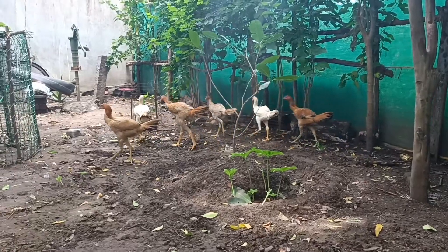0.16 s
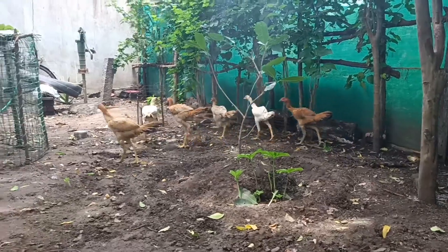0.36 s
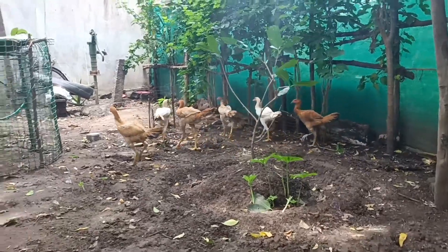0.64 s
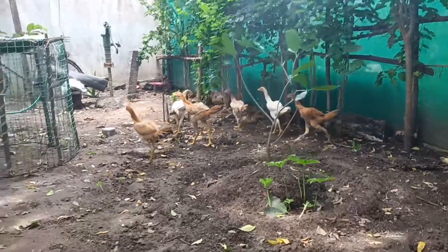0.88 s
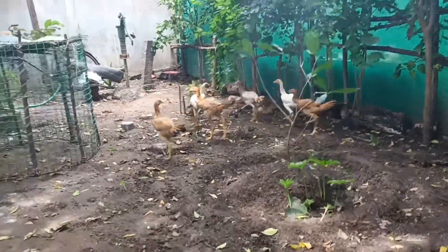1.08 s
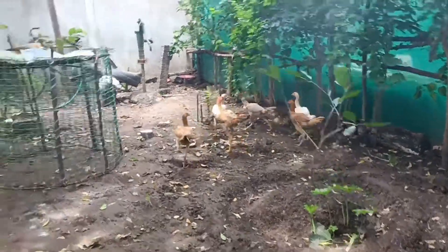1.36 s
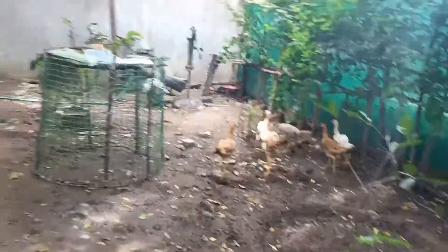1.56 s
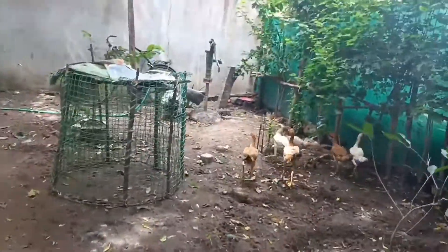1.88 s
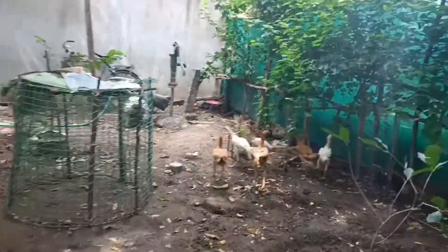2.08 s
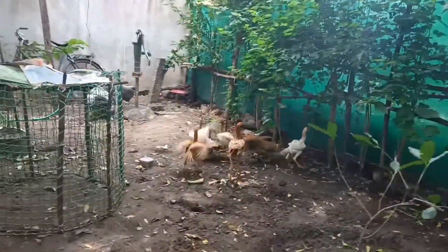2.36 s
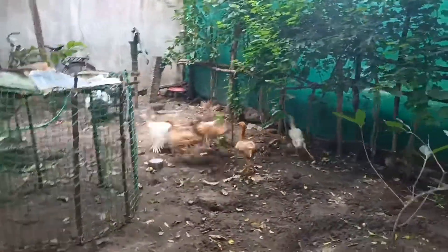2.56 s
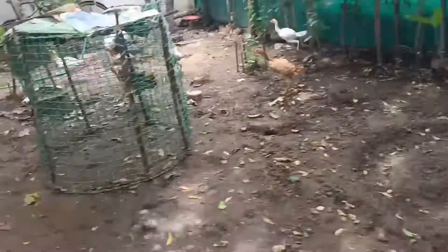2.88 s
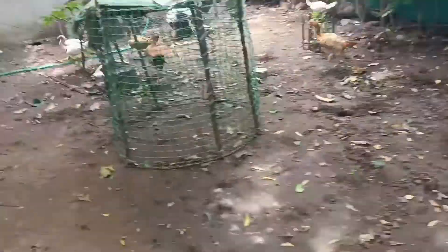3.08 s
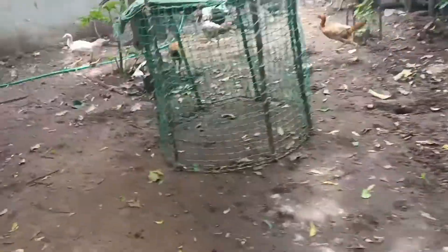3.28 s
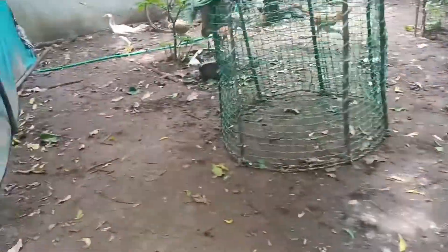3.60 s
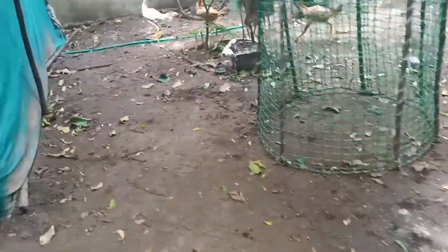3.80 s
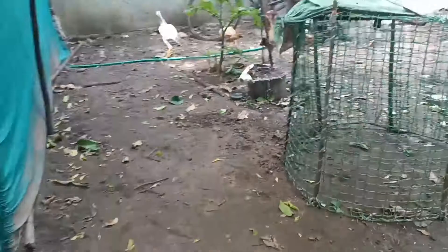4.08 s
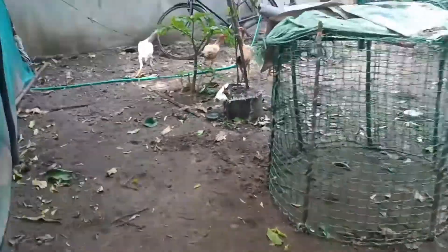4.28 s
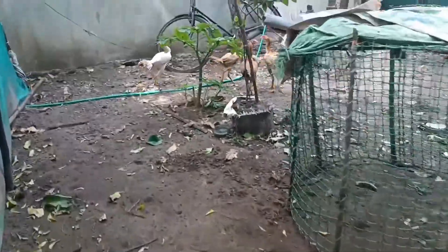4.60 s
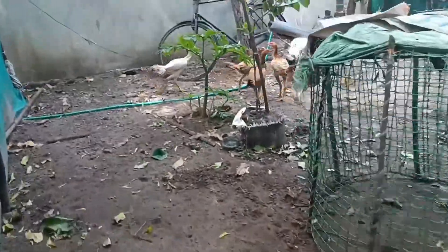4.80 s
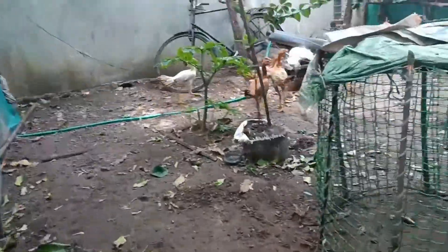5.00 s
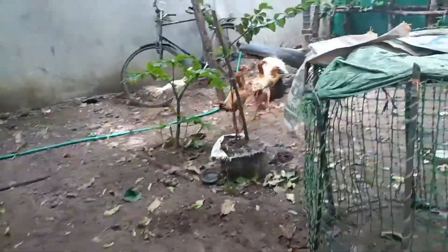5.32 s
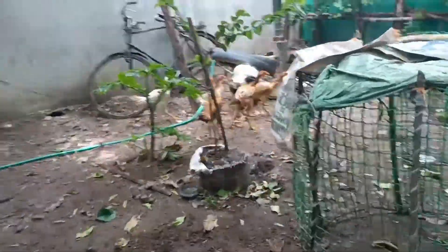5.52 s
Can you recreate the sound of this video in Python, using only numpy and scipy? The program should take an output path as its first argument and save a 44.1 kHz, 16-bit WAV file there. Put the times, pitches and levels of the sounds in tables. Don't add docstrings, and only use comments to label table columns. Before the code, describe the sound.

Quiet yard with faint peeps, then a loud flurry of flapping, leaf crackle and a rattling cage, followed by hoarse hen squawks and light footsteps.

```python
import sys
import numpy as np
from scipy import signal
from scipy.fft import rfft, irfft, next_fast_len
from scipy.io import wavfile
from scipy.ndimage import uniform_filter1d

SR = 44100
rng = np.random.default_rng(int(sys.argv[2]) if len(sys.argv) > 2 else 0)


def amplitude_ratio(level_db):
    exponent = np.asarray(level_db, float) / 20
    return 10 ** exponent


def put_to_file(sound):
    columns = np.atleast_2d(sound).T
    safe = np.clip(columns, -1, 1)
    whole_steps = np.round(safe * 32767)
    wavfile.write(sys.argv[1], SR, whole_steps.astype(np.int16))


N = 249165


def evened(x):
    return x / np.sqrt(np.mean(x ** 2) + 1e-20)


def read(points, hz):
    f, value = np.transpose(points)
    return np.interp(np.log(hz + 1), np.log(f + 1), value)


def add(mix, s, sound):
    part = mix[round(s * SR):][:len(sound)]
    part += sound[:len(part)]


def coloured(x, points):
    size = next_fast_len(len(x))
    gain = amplitude_ratio(read(points, np.fft.rfftfreq(size, 1 / SR)))
    return evened(irfft(rfft(x, size) * gain, size)[:len(x)])


def wobble(length, smooth_s):
    size = max(int(smooth_s * SR), 2)
    once = uniform_filter1d(rng.standard_normal(length), size)
    return evened(uniform_filter1d(once, size))


def resonate(x, hz, width_hz):
    turn = np.exp(2j * np.pi * np.cumsum(hz) / SR)
    r = np.exp(-np.pi * width_hz / SR)
    low = signal.lfilter([(1 - r) ** 2], [1, -2 * r, r * r], x / turn)
    return 2 * (turn * low).real


def sparse_breaks(per_s, spread_db):
    size = amplitude_ratio(spread_db * np.minimum(rng.exponential(1, N), 4))
    return size * (rng.random(N) < per_s / SR)


def crackle(per_s, spread_db, share):
    breaks = evened(sparse_breaks(per_s, spread_db) * rng.standard_normal(N))
    return share * breaks + np.sqrt(1 - share ** 2) * rng.standard_normal(N)


def swell(peak_s, rise_s, dying_s):
    drop_db = 15.5
    t = np.arange(N) / SR - peak_s
    return amplitude_ratio(-2 * drop_db * np.maximum(-t / rise_s, t / dying_s))


# frequency in Hz, level in dB per Hz.
WIND_SPECTRUM = [(15, -50), (25, -8), (51, -1), (86, 8), (134, 0.5), (187, -10.5), (250, -39), (320, -47),
                 (550, -120)]
# time in seconds, level in dB.
BREEZE = [(0, -52), (.63, -58), (.97, -48), (1.07, -54.5), (1.35, -52), (1.86, -70), (2.22, -60),
          (2.3, -40.5), (2.859, -50), (3.05, -54.5), (3.8, -49), (4.15, -50.5), (5, -52.5), (5.45, -49),
          (5.65, -53)]
# peak in seconds, dying time in seconds, level in dB.
PUFFS = [(.55, 0.038, -39.5), (1.121, 0.12, -33), (1.299, 0.099, -40), (1.92, 0.58, -58),
         (2.52, 0.041, -41), (3.341, 0.014, -36.5), (3.59, 0.04, -46), (3.71, 0.039, -33),
         (4.31, 0.19, -46), (4.5, 0.069, -43.5), (4.94, 0.015, -44), (5.07, .2, -52)]


def wind():
    power = amplitude_ratio(2 * np.interp(np.arange(N) / SR, *np.transpose(BREEZE)))
    for s, dying_s, db in PUFFS:
        power = power + amplitude_ratio(2 * db) * swell(s, 0.028, dying_s)
    lumps = amplitude_ratio(0.36 * wobble(N, 0.017))
    return np.sqrt(power) * lumps * coloured(rng.standard_normal(N), WIND_SPECTRUM)


# frequency in Hz, level in dB per Hz.
HUSH_SPECTRUM = [(18, -44), (30, -5), (81, -3), (295, -5.5), (336, -5.5), (449, -5.5), (780, -11.5),
                 (5740, -42), (8980, -27), (16000, -56)]


def far_hush():
    return amplitude_ratio(-63) * coloured(rng.standard_normal(N), HUSH_SPECTRUM)


# time in seconds, stir in dB, bare soil over leaves in dB.
STIR = [(0, -70, 12), (.2, -60.5, -0.5), (.93, -65, 6.5), (1.21, -64.5, 6.5), (1.72, -70.5, -0.5),
        (1.89, -66.5, 1), (1.93, -75, 9), (2.26, -62.5, -11), (2.32, -48.5, 3.5), (2.7, -46, -6),
        (3.02, -44, -4.5), (3.49, -72.5, 12), (3.7, -63, 9.5), (4.23, -61.5, 11), (4.9, -59, 7),
        (5.13, -60, 4.5), (5.32, -54, 3.5), (5.65, -57.5, 3)]
# peak in seconds, dying time in seconds, strength, dig into soil and weight in dB.
STEPS = [
    (0.831, 0.12, -58, -11, 10),
    (3.869, 0.11, -56.5, 12.5, 3.5),
    (4.4, 0.038, -52.5, -4, -2),
    (4.639, 0.16, -53.5, 11, -16),
    (5.268, 0.018, -45, 5.5, -22),
    (5.57, 0.06, -66, 12, -3),
]
SCUFFS = [
    (0.541, 0.048, -47, -1.5, 3.5),
    (1.92, 0.45, -52, 3.5, -2.5),
    (2.297, 0.1, -38, -5, 5.5),
    (2.394, 0.13, -29, -4.5, -0.5),
    (2.722, 0.097, -33, 2.5, 5.5),
    (5.166, 0.14, -47.5, 7, -24.5),
]
FLAPS = [
    (2.522, 0.085, -31.5, 0.5, 5.5),
    (2.61, 0.11, -37, -3, 9),
    (3.08, 0.062, -40, -21, -22),
]
FLUTTERS = [
    (2.898, 0.046, -40, -1, -1),
    (3.131, 0.11, -39, -3, -28),
    (3.19, 0.032, -43.5, -2, -7),
    (3.259, 0.2, -42.5, 1, -13),
    (3.338, 0.046, -45, -6, -1),
    (3.409, 0.16, -48.5, 0.5, 0),
    (3.5, 0.24, -51, 0, -15),
]
# rise in seconds, feather swish over strength in dB.
STROKE_KINDS = [
    (0.038, 3),
    (0.018, -10),
    (0.063, -4.5),
    (0.051, 4),
]


def effort():
    s, *columns = np.transpose(STIR)
    stir_db, bare_db = (np.interp(np.arange(N) / SR, s, c) for c in columns)
    layers_db = np.array([0 * bare_db, bare_db / 2 - 3.5, bare_db, bare_db - 4.5])
    power = amplitude_ratio(2 * (stir_db + layers_db))
    for rows, (rise_s, swish_db) in zip((STEPS, SCUFFS, FLAPS, FLUTTERS), STROKE_KINDS):
        for peak_s, dying_s, db, dig_db, weight_db in rows:
            layers_db = db + np.array([0, swish_db, dig_db, weight_db])
            power = power + amplitude_ratio(2 * layers_db)[:, None] * swell(peak_s, rise_s, dying_s)
    return np.sqrt(power)


def patchy(x):
    z = signal.stft(x, nperseg=256)[2]
    field = uniform_filter1d(rng.standard_normal(z.T.shape), size=4, axis=0)
    field = uniform_filter1d(field, size=9, axis=1)
    lift = amplitude_ratio(1.8 * evened(field).T)
    return evened(signal.istft(z * lift, nperseg=256)[1][:N])


def pebbles(per_s, spread_db, cycles):
    size = sparse_breaks(per_s, spread_db)
    kind, out = rng.integers(0, 24, N), np.zeros(N)
    for k, hz in enumerate(np.geomspace(500, 4500, 24)):
        turns = np.arange(int(3 * cycles * SR / hz)) * hz / SR
        ring = np.sin(2 * np.pi * turns) * np.exp(-turns / cycles)
        ring = ring * np.minimum(turns, 1) * np.sqrt(hz)
        out += signal.oaconvolve(size * (kind == k), ring)[:N]
    return evened(out)


# frequency in Hz, level in dB per Hz.
LEAVES = [(3240, -29.5), (5500, -17), (6120, -16.5), (7520, -12), (9400, 0), (10200, -10), (12200, -15.5),
          (14900, -23), (16000, -12.5)]
# frequency in Hz, level in dB per Hz.
SWISH = [(2500, -7), (3500, 1), (4500, 0.5), (6000, -6), (7500, -2), (9000, -55)]
# frequency in Hz, level in dB per Hz.
SOIL = [(250, -36), (400, -11), (800, -6), (1400, -0.5), (2100, 0), (2900, -3.5), (3400, -12),
        (4600, -18.5), (7000, -27.5)]
# frequency in Hz, level in dB per Hz.
THUD = [(53, -65), (90, -6), (135, 1), (313, -0.5), (410, -4), (496, -15.5), (554, -5), (600, -10),
        (780, -9.5), (1320, -120)]


def movement():
    jostle = wobble(N, 0.033)
    leaves = patchy(coloured(crackle(2500, 2.9, 0.47), LEAVES))
    leaves = amplitude_ratio(1.53 * jostle + 1.16 * wobble(N, 0.003)) * leaves
    swish = amplitude_ratio(2 * jostle - 6) * patchy(coloured(crackle(3000, 4, 0.38), SWISH))
    grit = coloured(crackle(1200, 4, 0.3), SOIL) + 0.7 * coloured(pebbles(900, 3.5, 10), SOIL)
    soil = amplitude_ratio(1.4 * jostle) * grit
    thud = amplitude_ratio(1.5 * wobble(N, 0.019)) * coloured(crackle(300, 0.7, 0.4), THUD)
    return (effort() * [leaves, swish, soil, thud]).sum(0)


def note(length_s, start_hz, end_hz, parts_db, rough):
    u = np.linspace(0, 1, int(length_s * 1.154 * SR))
    glide = (1 - np.cos(np.pi * u)) / 2
    hz = start_hz + (end_hz - start_hz) * glide + 150 * rough * wobble(len(u), 0.0018)
    turns = np.cumsum(hz) / SR
    tone = sum(amplitude_ratio(db) * np.sin(2 * np.pi * (k + 1) * turns) for k, db in enumerate(parts_db))
    falter = amplitude_ratio(1.5 * (wobble(len(u), 0.004) - 0.5))
    shape = np.sin(np.pi * u ** 0.82) ** 0.83 * falter
    return np.sqrt(2) * tone * shape * (1 + rough * wobble(len(u), 0.0016))


# start
# and length in seconds, start and end pitch in Hz, level in dB.
THIN_PEEPS = [(.905, 0.062, 900, 908, -49), (.965, 0.046, 986, 880, -46.5), (3.528, 0.046, 1720, 1710, -43),
              (1.254, 0.028, 1108, 1043, -37), (1.544, 0.053, 905, 872, -51.5),
              (1.774, 0.034, 930, 934, -57.5), (2.007, 0.06, 960, 896, -47),
              (2.335, 0.016, 1260, 1520, -27), (2.35, 0.016, 1440, 1270, -18.5),
              (2.346, 0.037, 1990, 2055, -29.5), (2.364, 0.014, 1058, 993, -18.5),
              (2.366, 0.01, 3110, 3030, -32), (2.368, 0.023, 4150, 4035, -42.5),
              (2.489, 0.017, 1434, 1330, -27), (2.506, 0.013, 1350, 1270, -19),
              (2.66, 0.068, 1583, 1516, -38.5), (2.49, 0.044, 1804, 1764, -31.5),
              (2.566, 0.016, 1400, 1250, -29.5), (2.59, 0.054, 886, 905, -33),
              (3.39, 0.018, 2114, 2060, -53), (3.44, 0.037, 2110, 2130, -46.5),
              (3.481, 0.038, 2060, 2074, -46), (3.573, 0.019, 1140, 1130, -42.5),
              (3.713, 0.04, 1942, 2080, -44.5), (4.972, 0.038, 2100, 1998, -35.5),
              (5.015, .016, 1970, 1930, -42), (5.083, 0.029, 1166, 1130, -48.5),
              (5.145, 0.033, 945, 796, -39.5), (5.548, 0.04, 3700, 3690, -57.5),
              (5.575, 0.016, 2790, 2820, -53)]
# start and length in seconds, start and end pitch in Hz, level in dB.
REEDY_PEEPS = [(.24, 0.068, 900, 853, -61.5), (1.1, 0.078, 824, 783, -51.5), (1.312, 0.052, 920, 850, -59),
               (2.222, 0.048, 824, 745, -45), (2.384, 0.032, 773, 910, -30.5),
               (3.524, 0.072, 878, 878, -40), (3.727, 0.03, 1202, 935, -35.5),
               (4.292, 0.041, 1197, 1000, -33.5), (4.645, .04, 890, 833, -43),
               (4.977, 0.047, 1232, 1086, -38), (5.007, 0.057, 1026, 920, -44.5),
               (5.109, 0.026, 860, 800, -46), (5.178, 0.025, 892, 996, -38),
               (5.195, 0.02, 1295, 1250, -40.5)]


def peeps():
    out = np.zeros(N)
    for rows, octave_db in ((THIN_PEEPS, -43), (REEDY_PEEPS, -9)):
        for s, length_s, start_hz, end_hz, db in rows:
            rough = 0.18 + 0.006 * max(db + 36, 0)
            parts_db = [0, octave_db, octave_db - 46]
            add(out, s, amplitude_ratio(db) * note(length_s, start_hz, end_hz, parts_db, rough))
    return out


# start and length in seconds, start and end pitch in Hz, level in dB.
CLUCKS = [
    (.24, 0.046, 288, 280, -63),
    (0.896, 0.045, 532, 462, -48),
    (3.572, 0.044, 484.6, 464, -48),
    (5.175, 0.037, 467.7, 441, -38.5),
]
CLUCK_OVERTONES_DB = [-1.5, -3, -12, -37]


def clucks():
    out = np.zeros(N)
    for s, length_s, start_hz, end_hz, db in CLUCKS:
        sag = 1 - end_hz / start_hz
        low_db = min(348 * sag - 24, 0)
        add(out, s, amplitude_ratio(db) * note(length_s, start_hz, end_hz, [low_db] + CLUCK_OVERTONES_DB, rough=0.32))
    return out


# start and length in seconds,
# centre and width in Hz, level in dB.
RASPS = [(0.508, 0.044, 12600, 5000, -62), (0.547, 0.042, 910, 900, -56), (0.7, .05, 10500, 5000, -66),
         (1.09, 0.212, 1625, 200, -55.5), (2.374, 0.081, 2980, 900, -39), (2.406, 0.025, 1330, 400, -30),
         (2.57, 0.0267, 2800, 595, -41), (2.63, 0.029, 2730, 300, -48), (2.682, 0.018, 1000, 900, -31),
         (2.732, 0.037, 2480, 150, -38), (2.79, 0.027, 1130, 400, -36), (3.824, 0.046, 2400, 500, -51),
         (3.889, 0.041, 1000, 150, -50), (3.933, 0.032, 2450, 250, -48.5), (4.159, 0.042, 2620, 306, -54),
         (4.251, 0.07, 2150, 500, -46), (4.348, 0.12, 1610, 403, -40.5), (4.353, 0.068, 3050, 300, -56),
         (4.562, 0.072, 1480, 497, -43.5), (4.631, 0.03, 2780, 1200, -46.5), (4.76, 0.1, 2600, 300, -49),
         (5.149, 0.037, 2700, 500, -44.5), (5.168, 0.0174, 2130, 250, -39), (5.201, 0.05, 2690, 400, -44),
         (5.207, 0.1, 2260, 600, -43.5), (5.154, 0.091, 12500, 5000, -55), (5.328, .03, 2800, 400, -52.5),
         (5.369, 0.036, 3140, 604, -50.5), (5.401, 0.061, 2230, 253, -50.5),
         (5.408, 0.043, 3500, 600, -54.5), (5.47, 0.12, 2140, 350, -53),
         (.9, 0.084, 1000, 300, -49.5), (1.2, 0.14, 390, 300, -60), (2.95, 0.095, 305, 248, -53),
           (3.58, 0.073, 944, 89.5, -47.5), (3.59, 0.038, 1450, 120, -49), (2.53, 0.026, 1210, 200, -36),
           (2.6, 0.028, 900, 80, -36.5), (4.37, 0.11, 630, 120, -54.5), (1.04, 0.035, 1850, 500, -55),
           (1.28, 0.071, 905, 300, -54), (1.92, 0.086, 1500, 300, -58), (1.94, 0.063, 2550, 700, -52.5),
           (2.03, .03, 2420, 600, -61), (2.14, .04, 2030, 250, -67), (2.335, 0.044, 3450, 400, -45.5),
           (2.4, 0.031, 3800, 1500, -41), (2.72, 0.035, 3050, 200, -44), (3.0, 0.022, 2930, 600, -43.5),
           (3.1, 0.092, 1430, 350, -38), (3.11, 0.06, 2950, 1200, -40), (3.245, 0.035, 4500, 1200, -43.5),
           (3.33, .025, 4460, 1500, -45), (3.398, 0.017, 370, 300, -43.5), (3.95, 0.1, 4970, 3000, -61),
           (4.8, 0.03, 3380, 500, -51), (5.2, 0.058, 900, 200, -58)]


def rasps():
    out, grain = np.zeros(N), crackle(1500, 2.9, 0.4)
    for s, length_s, hz, width_hz, db in RASPS:
        part = grain[round(s * SR):][:int(length_s * SR)]
        sound = evened(resonate(part, np.full(len(part), hz), width_hz))
        add(out, s, amplitude_ratio(db) * sound * signal.windows.tukey(len(part), 0.39))
    return out


# start in seconds, peak in dB, ring in Hz, t60 in seconds.
TICKS = [(0.5335, -35, 1800, 0.007), (1.0912, -31, 2400, 0.0076), (1.256, -42, 2490, 0.007),
         (2.216, -54, 2800, 0.008), (2.97, -40, 11000, .004), (3.21, -24.5, 4200, 0.0068),
         (2.3376, -24, 2300, 0.0073), (2.4455, -28, 3000, 0.012), (2.5145, -15.5, 2400, 0.012),
         (2.645, -22, 1600, 0.0088), (5.154, -40, 2400, 0.015), (4.977, -40, 1700, .02),
         (1.845, -37, 2440, 0.012), (2.0415, -38, 11000, .004), (2.6045, -15, 2000, .02),
         (2.6077, -4, 1960, 0.0073), (2.57, -13.5, 1460, 0.017), (2.798, -18, 1700, 0.0072),
         (2.895, -26, 3600, 0.019), (4.092, -32, 640, 0.025), (4.125, -22.5, 1230, 0.0052),
         (4.4, -29.5, 2500, .012), (3.419, -33, 2870, 0.016), (3.6788, -28.5, 8600, 0.0097),
         (3.6789, -33, 14500, 0.007), (3.49, -38, 6200, .004), (3.332, -38, 12500, .004),
         (3.909, -37, 7200, 0.0056), (4.207, -30, 530, 0.016), (4.2935, -29, 910, 0.014),
         (4.351, -31, 5700, 0.0041), (4.709, -33, 3670, 0.013), (4.734, -29, 3700, 0.007),
         (4.817, -44, 4500, 0.031), (4.915, -38, 4200, 0.02), (5.265, -35, 1660, 0.008),
         (5.249, -25, 2540, .008), (5.178, -28, 2230, .01)]


def ticks():
    out, t = np.zeros(N), np.arange(int(0.03 * SR)) / SR
    for s, db, hz, t60 in TICKS:
        spread = 1 + 5.5 / (hz * t60)
        ratios = [spread ** k for k in (-1, 0, 1, 2)]
        ring = sum(np.sin(2 * np.pi * hz * ratio * t) / ratio for ratio in ratios) / 2
        add(out, s, amplitude_ratio(db - 60 * t / max(t60, 0.001)) * ring * np.minimum(hz * t, 1))
    return out


# start in seconds, peak in dB, low part over it in dB.
SNAPS = [(.5342, -46, -12), (.547, -38, -4), (.559, -30, -1), (.683, -45, -15), (.848, -39, -11),
         (2.078, -36, 5), (2.569, -16, 9), (2.63, -13, -10), (2.685, -20, 1), (2.756, -10.5, -8),
         (2.8, -16.5, 2), (2.887, -15, -10), (3.053, -19, -15), (3.517, -35, -11), (4.398, -33, -3),
         (4.638, -30, -6), (5.273, -41, -9), (1.793, -36, -4), (1.909, -21, -2), (2.0413, -51, -3),
         (2.1836, -40.5, 10), (2.2903, -10, 1), (2.3368, -24, 13), (2.3682, -41, 3), (2.5142, -8, -4),
         (2.6084, -23, 6), (2.7169, -6, -2), (3.005, -22, -13), (3.1154, -12.5, -7), (3.246, -20, -11),
         (3.331, -36, -17), (4.349, -26, 7), (4.706, -20.5, 2), (4.732, -22.5, -0.5), (4.9129, -32, -8),
         (5.1477, -34, 7), ]


def snaps():
    out, t = np.zeros(N), np.arange(int(0.25 * SR)) / SR
    t60_s, rise_s = 0.065, 0.0015
    for s, db, low_db in SNAPS:
        grit = rng.standard_normal((2, len(t))) * amplitude_ratio(2.5 * wobble(len(t), 0.002))
        spray = coloured(grit[0], LEAVES) + amplitude_ratio(low_db) * coloured(grit[1], SOIL)
        add(out, s, amplitude_ratio(db - 18 - 60 * t / t60_s) * np.minimum(t / rise_s, 1) * spray)
    return out


def squawk(rows):
    s, *columns = np.transpose(rows)
    t = np.arange(s[0], s[-1], 1 / SR)
    effort_db, throat_hz, beak_hz, beak_db = (np.interp(t, s, c) for c in columns)
    beats = np.cumsum(85 * (1 + 0.22 * wobble(len(t), 0.02))) / SR
    turns = np.cumsum(throat_hz * (1 + 0.009 * wobble(len(t), 0.02))) / SR
    sway = amplitude_ratio(3 * wobble(len(t), 0.03))
    upper = np.sin(2 * np.pi * (turns + beats / 2))
    lower = 0.9 * sway * np.sin(2 * np.pi * (turns - beats / 2))
    pulses = np.diff(np.floor(beats + 0.5), prepend=0)
    breath = (0.5 + np.exp(-(beats % 1) / 0.5)) * rng.standard_normal(len(t))
    drive = 0.3 * evened(pulses) + 0.9 * evened(breath)
    throat = 0.8 * evened(upper + lower) + 0.45 * evened(resonate(drive, throat_hz, 150))
    beak = resonate(drive, beak_hz * 1.009, 106) - 0.38 * resonate(drive, beak_hz * 0.834, 220)
    beak = amplitude_ratio(beak_db - 2.9) * evened(beak)
    chest = amplitude_ratio(-24) * evened(resonate(drive, throat_hz * 0.49, 200))
    return amplitude_ratio(effort_db) * (throat - beak + chest) * signal.windows.tukey(len(t), 0.12)


# time in seconds, effort in dB, throat in Hz, beak in Hz, beak over throat in dB.
SQUAWKS = [
    [(1.04, -78, 1290, 1730, 11), (1.186, -66.5, 1312, 1620, 15), (1.29, -73, 1163, 1640, 10)],
    [(3.04, -44, 1168, 1700, -10), (3.06, -40, 1211, 1750, -20), (3.11, -34.5, 1298, 1703, 0.5),
     (3.192, -35.5, 1238, 1740, -8), (3.308, -40, 1243, 1700, 6.5), (3.4, -56, 1297, 1610, -5)],
    [(4.325, -39, 1190, 1720, 1), (4.376, -35, 1231, 1810, -6), (4.46, -34.5, 1286, 1870, -11),
     (4.516, -38, 1286, 1830, -5), (4.534, -39, 1253, 1783, 0.5), (4.65, -45, 1200, 1774, 2),
     (4.68, -70.5, 1300, 1700, 2)],
]
# time in seconds, effort in dB, throat in Hz, beak in Hz, beak over throat in dB.
HIGH_SQUAWK = [
    (3.81, -52, 1545, 1530, -20),
    (3.848, -32, 1538, 1590, -34),
    (3.92, -36.5, 1510, 1670, -12),
    (3.97, -47, 1434, 1716, 4),
    (3.996, -53, 1330, 1790, 15),
    (4.056, -51.5, 1330, 1686, 15.5),
    (4.085, -52.5, 1225, 1720, 17),
    (4.15, -61, 1210, 1640, 9),
]


def squawks():
    out = np.zeros(N)
    for rows in SQUAWKS + [HIGH_SQUAWK]:
        add(out, rows[0][0], squawk(rows))
    return out


# start in seconds, peak in dB, push in Hz.
CLAPS = [(1.113, -29.5, 187), (3.558, -25, 85), (2.286, -18, 196), (2.339, -21.5, 355), (2.381, -17.5, 335),
         (2.427, -17, 209), (2.494, -14.5, 291), (2.576, -14.5, 245), (2.679, -17.5, 329),
         (2.719, -17, 258), (2.792, -23.5, 199)]


def wing_claps():
    out, t = np.zeros(N), np.arange(int(0.2 * SR)) / SR
    for s, db, hz in CLAPS:
        push = np.sin(2 * np.pi * hz * t) * np.minimum(t / 0.0043, 1)
        add(out, s, amplitude_ratio(db - 4 - 60 * t / 0.074) * push)
    return out


# frequency in Hz, level in dB, t60 in seconds.
CAGE_RINGS = [(272, -1, 0.05), (648, 7.5, 0.019), (770, 3.5, 0.02), (1000, 7, 0.029), (1137, 8, 0.031),
              (1330, 5, 0.023), (1585, -6, 0.034), (2130, -5, 0.044), (3050, -14, 0.097),
              (3730, -22, 0.076), (4930, -26, 0.0615)]
# seconds after the blow, level in dB.
RESTRIKES = [
    (0, 5),
    (.0022, -6),
    (.0096, -1.5),
    (.0135, -5),
    (.0174, -1),
    (.037, -13),
    (.058, -15),
    (.079, -12),
]


def cage():
    out, t = np.zeros(N), np.arange(int(0.2 * SR)) / SR
    rings = sum(amplitude_ratio(db - 60 * t / t60) * np.sin(2 * np.pi * hz * t) for hz, db, t60 in CAGE_RINGS)
    rings = rings * np.minimum(t / 0.0022, 1)
    loose_hits = rng.standard_normal(len(t)) * (rng.random(len(t)) < 350 / SR)
    rattle = amplitude_ratio(-14 - 60 * t / 0.12) * loose_hits
    for k, (s, db) in enumerate(RESTRIKES):
        rattle[round(s * SR)] = (-1) ** k * amplitude_ratio(db)
    clatter = signal.fftconvolve(rattle, rings)
    add(out, 2.718, amplitude_ratio(-9) * clatter / abs(clatter).max())
    return out


# frequency in Hz, t60 in seconds.
WALLS = [(300, 0.2), (1500, 0.39), (8000, 0.062)]


def yard(x):
    taps = np.zeros(SR // 2)
    at = np.arange(300, len(taps) - 20, 20)
    taps[at + rng.integers(0, 20, len(at))] = rng.choice([-1., 1.], len(at))
    hz, t, z = signal.stft(taps, SR, nperseg=256)
    decay = amplitude_ratio(-60 * t / read(WALLS, hz)[:, None])
    tail = signal.istft(z * decay, SR, nperseg=256)[1]
    return signal.fftconvolve(x, tail / np.linalg.norm(tail))[:N]


def scene():
    flock = peeps() + clucks() + squawks()
    hits = ticks() + snaps() + wing_claps() + cage()
    echoes = yard(amplitude_ratio(-16) * flock + amplitude_ratio(-12) * hits)
    return (wind() + far_hush() + movement() + flock + rasps() + hits + echoes)[None]


def low_pass(x):
    return signal.sosfilt(signal.butter(12, 16630, fs=SR, output="sos"), x)


def record(dry):
    bass_cut = signal.butter(2, 41.7, "high", fs=SR, output="sos")
    thin = signal.sosfilt(bass_cut, dry)
    treble_edge = signal.firwin(801, 15750, window=("kaiser", 5), fs=SR)
    limited = signal.oaconvolve(thin, treble_edge[None], "same")
    return low_pass(limited)


dry = scene()
out = record(dry)
put_to_file(out)
```